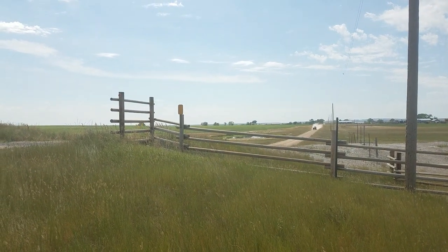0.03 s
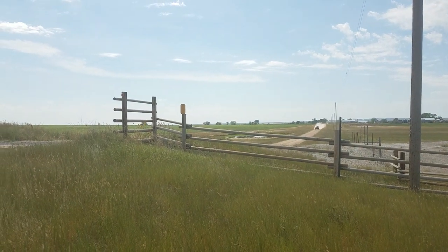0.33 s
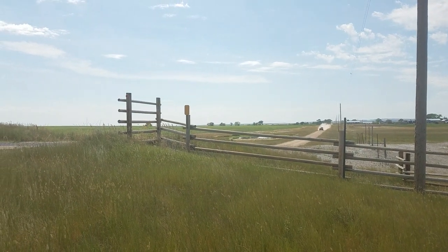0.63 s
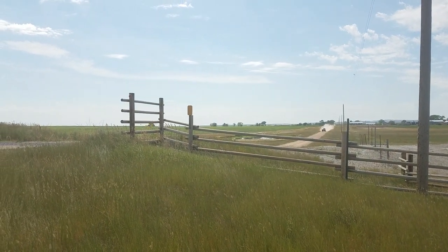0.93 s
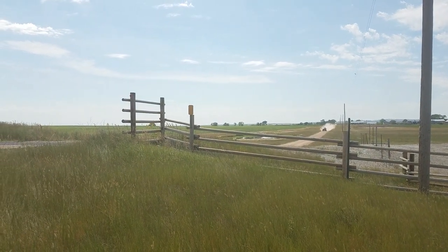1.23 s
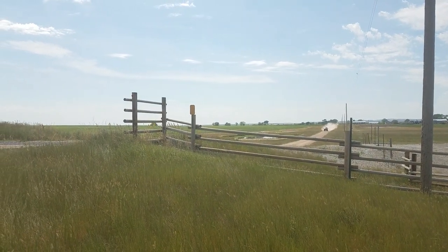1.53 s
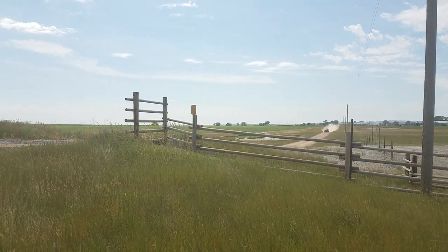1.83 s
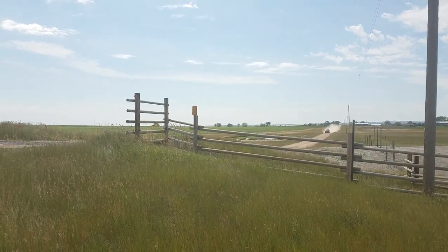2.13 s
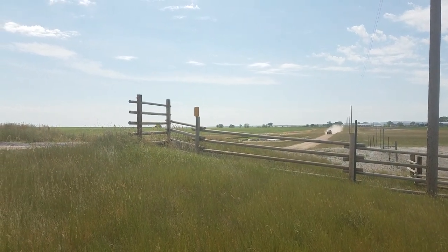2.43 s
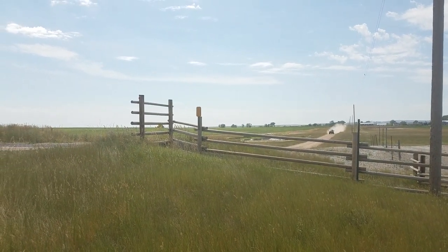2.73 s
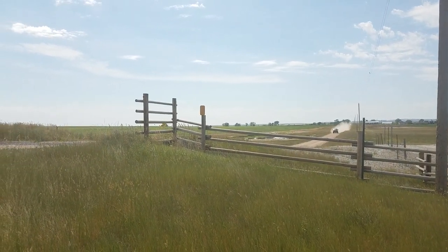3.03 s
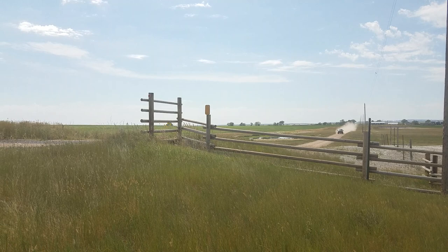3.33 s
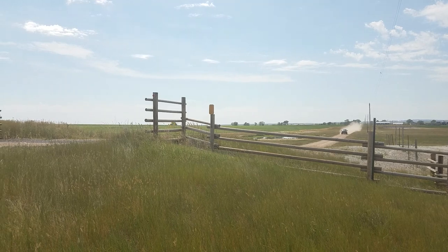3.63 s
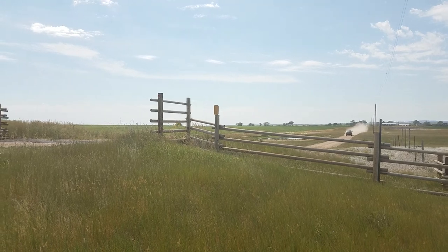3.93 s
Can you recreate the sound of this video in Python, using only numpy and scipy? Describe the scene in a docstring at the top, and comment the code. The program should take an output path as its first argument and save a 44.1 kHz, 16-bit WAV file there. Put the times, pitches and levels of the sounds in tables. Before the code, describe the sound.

Across an open field, a distant truck hums along with a soft tyre roar, climbs gently in pitch, changes up a gear and grows slightly louder. Nearby grass rustles and light gusts rumble on the microphone throughout.

```python
"""A V8 truck pulls steadily down a gravel road far across a grassy field and shifts up at 2.7 s. Its periodic
exhaust pulses give a firing tone with harmonics; uneven cylinders add weaker orders between them, which the
exhaust resonances shape. The tones waver in the moving air, and the tyres roar faintly. Close by, a breeze
rustles the grass and buffets the microphones, over a thin high hiss."""
import sys
import numpy as np
from scipy import signal
from scipy.fft import rfft, irfft
from scipy.io import wavfile

SR = 44100
rng = np.random.default_rng(int(sys.argv[2]) if len(sys.argv) > 2 else 0)


def unload_audio(sound):
    """Save the sound as a 16-bit wav file, at the path given as the first command line argument."""
    columns = np.transpose(np.atleast_2d(sound))
    # keep every value between -1 and 1, then stretch to whole-number steps
    steps = np.round(np.clip(columns, -1, 1) * 32767)
    wavfile.write(sys.argv[1], SR, steps.astype(np.int16))


N = 176400

CYLINDERS = 8
FLUTTER_HZ = 18.2  # bandwidth of the tones' fast fluctuation in moving air
# engine speed: (time [s], firing rate [Hz])
FIRING_RATE = [(0, 226), (.4, 225), (.9, 236.5), (1.3, 235), (1.8, 243.4), (2.1, 242), (2.5, 249.5),
               (2.68, 243), (2.8, 223), (2.9, 214.3), (3.08, 215), (3.4, 215), (3.8, 220.4), (4, 219)]


def from_db(db):
    """Amplitude ratio: tenfold for every 20 dB."""
    return 10 ** (np.asarray(db) / 20)


def unit_rms(x):
    """Normalisation to a mean square of 1."""
    return x / np.sqrt(np.mean(x ** 2) + 1e-20)


def curve(rows):
    """Linear interpolation of (time [s], value) rows at every sample."""
    return np.interp(np.arange(N) / SR, *np.transpose(rows))


def drift(corner_hz):
    """Slow random fluctuation: white noise through a two-pole low-pass; rms 1."""
    step, settle = 40, 2000  # samples per step, steps for the filter to settle
    pole = np.exp(-2 * np.pi * corner_hz * step / SR)
    white = rng.standard_normal(N // step + settle + 2)
    slow = signal.lfilter([1], [1, -2 * pole, pole * pole], white)[settle:]
    return np.interp(np.arange(N) / step, np.arange(len(slow)), unit_rms(slow))


def resonance(hz, centre_hz, width_hz):
    """Band-pass response: 1 at the centre, falling steeply with detuning."""
    detuning = (hz ** 2 - centre_hz ** 2) / (hz * width_hz + 1e-9)
    return 1 / np.sqrt(1 + detuning ** 4)


def band_noise(centre_hz, width_hz):
    """A resonance excited by white noise; rms 1."""
    hz = np.arange(N // 2 + 1) * SR / N
    return unit_rms(irfft(rfft(rng.standard_normal(N)) * resonance(hz, centre_hz, width_hz), N))


def stereo_noise(spectrum, correlation):
    """Partly coherent coloured noise: in-phase and antiphase parts set the correlation; rms 1."""
    hz, db = np.transpose(spectrum)
    bins = np.arange(N // 2 + 1) * SR / N + 1e-9
    gain = from_db(np.interp(np.log(bins), np.log(hz), db)) * np.minimum(bins / hz[0], 1) ** 2
    mid, side = irfft(rfft(rng.standard_normal((2, N))) * gain, N)
    return unit_rms(np.sqrt(1 + correlation) * mid + np.sqrt(1 - correlation) * side * [[1], [-1]])


def scattered_tone(phase, scatter_rms=0.26, shift_s=2.83, shift_half_s=0.15, shift_share=0.78):
    """Scattering in moving air turns some of a tone's power to flutter; the gear change breaks it up."""
    gear_change = np.exp(-((np.arange(N) / SR - shift_s) / shift_half_s) ** 2)
    share = np.clip(scatter_rms ** 2 + shift_share * gear_change, 0, 1)
    phase = phase + rng.uniform(0, 2 * np.pi)
    direct = np.sin(phase)
    flutter = drift(FLUTTER_HZ) * direct + drift(FLUTTER_HZ) * np.cos(phase)
    return np.sqrt(2 * (1 - share)) * direct + np.sqrt(share) * flutter


def firing_tone(waver_db=0.7):
    """Periodic exhaust pulses radiate a harmonic series on the firing rate."""
    # harmonics 1 to 4, each: (time [s], level [dB])
    fundamental = [(0, -58.5), (.65, -57), (1.05, -62.5), (1.33, -63), (1.47, -56.5), (1.68, -56.5),
                   (2.2, -51), (2.6, -50.5), (2.82, -54.5), (2.97, -52), (3.13, -54), (3.36, -47.5),
                   (3.6, -48), (3.85, -43.5), (4, -44)]
    second = [(0, -67), (.3, -69.5), (.55, -85.5), (1.7, -80), (2.1, -71.5), (2.55, -65.5), (2.75, -69),
              (2.95, -61), (3.2, -63.5), (3.5, -59), (3.8, -54), (4, -57)]
    third = [(0, -77), (1.1, -75.5), (1.3, -68), (1.8, -70.5), (2.3, -73), (2.7, -88), (2.95, -61),
             (3.35, -68.5), (3.6, -76), (4, -69)]
    fourth = [(0, -92), (2.7, -89), (3.05, -77), (3.35, -82), (3.65, -68.5), (4, -75)]
    phase = 2 * np.pi * np.cumsum(curve(FIRING_RATE)) / SR
    tone = np.sqrt(2) * from_db(curve(fundamental) + waver_db * drift(FLUTTER_HZ)) * np.sin(phase)
    for k, level in enumerate([second, third, fourth], 2):
        tone += from_db(curve(level)) * scattered_tone(k * phase)
    return tone


def exhaust(waver_db=1.5, waver_hz=2.2):
    """Source and filter: exhaust resonances shape the orders of uneven cylinders and the rushing gas."""
    # orders: (multiple of the cycle rate, relative level [dB])
    orders = [(3, -4), (4, -2.5), (5, -1.5), (6, -4.5), (7, -1), (9, -2), (10, 4.5), (11, 2.5), (12, -5.5),
              (13, -5.5), (14, -7.5), (15, -4.5), (17, -8), (18, 0.5), (19, 3), (20, -6), (21, -4.5),
              (22, -0.5), (23, -4.5), (25, -9.5), (26, 0.5), (27, -1), (28, -1.5), (29, -6), (30, -4.5)]
    # strength of each resonance: (time [s], level [dB])
    low = [(0, -68), (.55, -64.5), (1.1, -68.5), (1.7, -68.5), (2.5, -61), (2.9, -68), (3.4, -65), (4, -69)]
    body = [(0, -75.5), (.5, -74.5), (1.2, -76.5), (1.9, -72), (2.5, -67), (2.8, -68.5), (3.1, -65),
            (3.5, -62), (3.85, -59.5), (4, -60)]
    mid = [(0, -78), (.7, -76.5), (1.6, -81.5), (2.05, -70), (2.5, -64), (2.7, -68.5), (2.95, -65.5),
           (3.4, -75), (4, -76)]
    upper = [(0, -68.5), (.45, -71), (.7, -67.5), (1.1, -71.5), (1.4, -72), (2.3, -80), (2.6, -68),
             (2.9, -66), (3.15, -68), (3.45, -63.5), (4, -68.5)]
    # resonances: (centre [Hz], width [Hz], relative gas noise [dB], level curve)
    modes = [(139.3, 103, -3, low), (366, 157, 1.5, body), (590, 110, -4.5, mid), (734, 117, -3, upper)]
    modes = [(hz, width, gas_db, from_db(curve(level))) for hz, width, gas_db, level in modes]
    cycle_hz = curve(FIRING_RATE) / CYLINDERS
    phase = 2 * np.pi * np.cumsum(cycle_hz) / SR
    tones = np.zeros(N)
    for k, db in orders:
        power = sum((gain * resonance(k * cycle_hz, hz, width)) ** 2 for hz, width, _, gain in modes)
        tones += np.sqrt(power) * from_db(db + waver_db * drift(waver_hz)) * scattered_tone(k * phase)
    gas = sum(gain * from_db(gas_db) * band_noise(hz, width) for hz, width, gas_db, gain in modes)
    return tones + gas


def rasp(centre_hz=1486, width_hz=290, orders_db=-12.5):
    """Noise and crowded high engine orders share one band and beat into a faint roughness."""
    # the rasp: (time [s], level [dB])
    level = [(0, -94), (1.1, -89), (1.7, -78.5), (2.2, -81), (2.38, -74), (2.65, -77), (3.1, -87),
             (3.5, -80), (4, -78.5)]
    cycle_hz = curve(FIRING_RATE) / CYLINDERS
    phase = 2 * np.pi * np.cumsum(cycle_hz) / SR
    orders = sum(resonance(k * cycle_hz, centre_hz, width_hz) * scattered_tone(k * phase)
                 for k in range(42, 62))
    return from_db(curve(level)) * (band_noise(centre_hz, width_hz) + from_db(orders_db) * orders)


def tyres(waver_db=1.56, waver_hz=8):
    """Rolling noise: countless gravel impacts merge at a distance into a soft roar."""
    # the roar: (time [s], level [dB])
    level = [(0, -65), (.35, -65.5), (1.05, -69.5), (1.6, -72), (2.17, -68.5), (2.3, -65), (2.65, -64.5),
             (2.83, -63.5), (3.17, -64.5), (3.35, -67), (4, -65)]
    # its spectrum: (frequency [Hz], relative density [dB])
    spectrum = [(200, 1.5), (500, -6.5), (800, 2), (930, -1.5), (1130, 4), (1400, -7.5), (2000, -20),
                (3000, -14), (6000, -30)]
    return from_db(curve(level) + waver_db * drift(waver_hz)) * stereo_noise(spectrum, correlation=0.91)


def grass(rustle_db=-68.5, hiss_db=-70, hiss_follows=0.65):
    """Flow noise: grass rustles all round, and a swish rises as the breeze freshens. Beside it lies the
    microphones' own thin high hiss, which rises a little over the same slow swell."""
    # strength of the breeze: (time [s], relative level [dB])
    breeze = [(0, -1), (1.3, -0.2), (2, 1), (2.5, 2.2), (3.05, 1), (3.7, 3.5), (4, 3)]
    # spectra: (frequency [Hz], relative density [dB])
    rustle_spectrum = [(300, 4), (900, -5.5), (1900, 0), (3000, -10), (4500, -12.5), (7000, -18),
                       (10000, -25.5), (16000, -32)]
    hiss_spectrum = [(1000, -11), (5000, -27), (8000, -14), (10000, -12.5), (12000, -6.5), (14000, -4),
                     (16000, -1)]
    # the swish: (time [s], level [dB])
    swish_level = [(0, -98), (3.3, -86), (3.75, -85), (3.9, -76), (4, -78)]
    breeze_db = curve(breeze)
    rustle = from_db(rustle_db + breeze_db) * stereo_noise(rustle_spectrum, correlation=0.013)
    hiss = from_db(hiss_db + hiss_follows * breeze_db) * stereo_noise(hiss_spectrum, correlation=0)
    swish = np.array([band_noise(centre_hz=4750, width_hz=1100) for _ in range(2)])
    return rustle + hiss + from_db(curve(swish_level)) * swish


def buffeting(base_db=-71.5, waver_db=5, waver_hz=8.6, pan_right_db=1.4):
    """Turbulent pressure on the microphones makes a lumpy rumble; the gusts add in power."""
    # the rumble: (frequency [Hz], relative density [dB])
    spectrum = [(18, -10.5), (45, 0), (80, 0.5), (150, -6), (280, -12), (450, -13.5), (900, -48.5)]
    # gusts: (time [s], half length [s], level [dB])
    gusts = [(.15, 0.047, -57.5), (0.847, 0.041, -64), (1.5, 0.069, -62), (1.597, 0.027, -56.5),
             (1.908, .025, -62), (2.094, 0.025, -54.5), (3.068, 0.05, -54.5), (3.25, 0.065, -56),
             (3.853, .13, -60.5)]
    t = np.arange(N) / SR
    power = from_db(base_db + waver_db * drift(waver_hz)) ** 2
    for peak_s, half_s, db in gusts:
        power += from_db(db) ** 2 * np.exp(-((t - peak_s) / half_s) ** 2)
    rumble = np.sqrt(power) * stereo_noise(spectrum, correlation=0.18)
    return rumble * from_db([[-pan_right_db], [pan_right_db]])


def arrival_delay(x, lag_samples=3):
    """Path difference: the road lies to the right, so its sound reaches the left microphone later."""
    n = np.arange(N)
    return np.array([np.interp(n - lag_samples, n, x[0]), x[1]])


def microphones(x):
    """Unequal frequency responses colour the two channels a little differently."""
    # left over right: (frequency [Hz], level difference [dB])
    imbalance = [(200, -0.95), (600, -.8), (1000, 1), (1250, 4.5), (1700, 3), (2300, 5), (2900, -0.3),
                 (5000, -1.2), (8000, .2), (15000, 0)]
    hz, db = np.transpose(imbalance)
    bins = np.arange(N + 1) * SR / (2 * N) + 1e-9
    gain = from_db(np.interp(np.log(bins), np.log(hz), db) / 2)
    mirrored = np.hstack([x, x[:, ::-1]])  # keeps the end from wrapping into the start
    return irfft(rfft(mirrored) * [gain, 1 / gain], 2 * N)[:, :N]


def scene():
    """Superposition of the far truck and the wind close by."""
    truck = firing_tone() + exhaust() + rasp() + tyres()
    return microphones(arrival_delay(truck) + grass()) + buffeting()


def record(dry):
    """Band limiting: an elliptic low-pass cuts the top steeply."""
    cutoff_hz = 15750
    return signal.sosfilt(signal.ellip(12, .1, 70, cutoff_hz, fs=SR, output="sos"), dry)


dry = scene()
out = record(dry)
unload_audio(out)
```